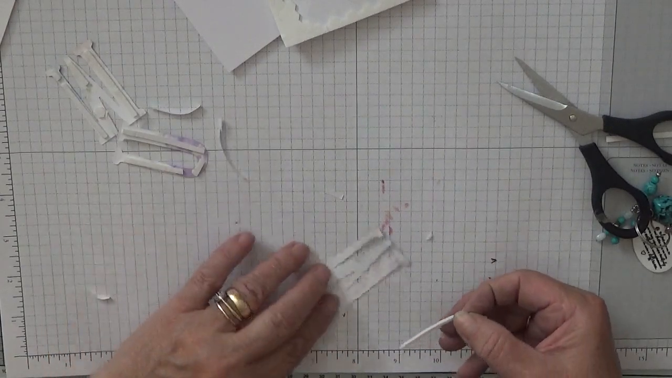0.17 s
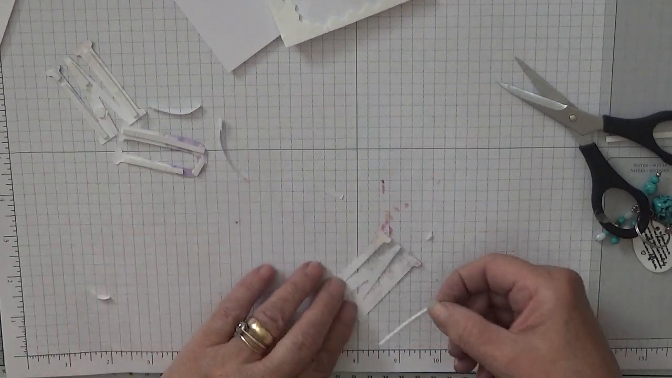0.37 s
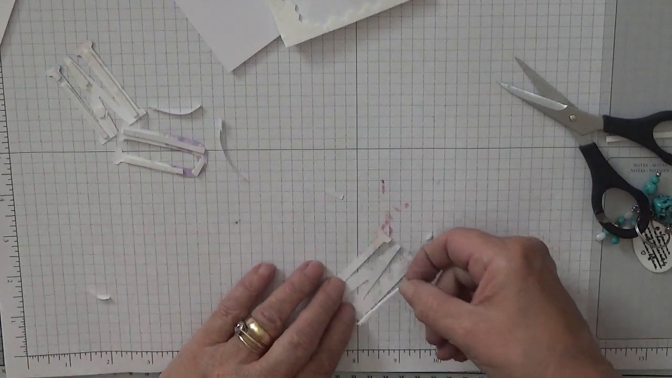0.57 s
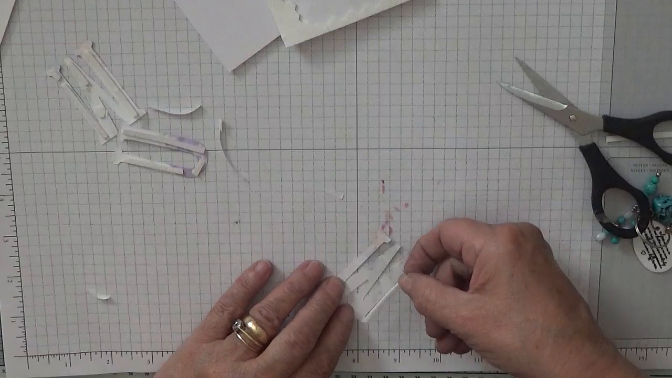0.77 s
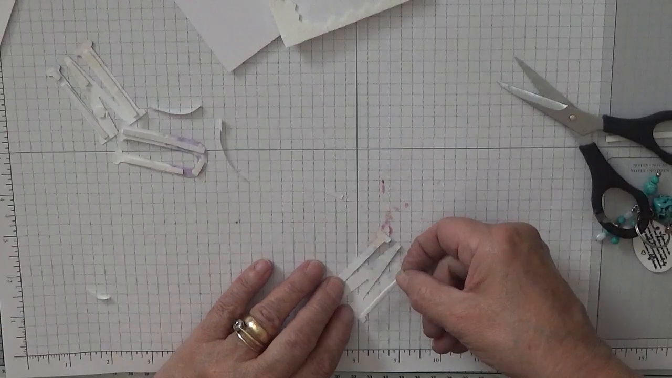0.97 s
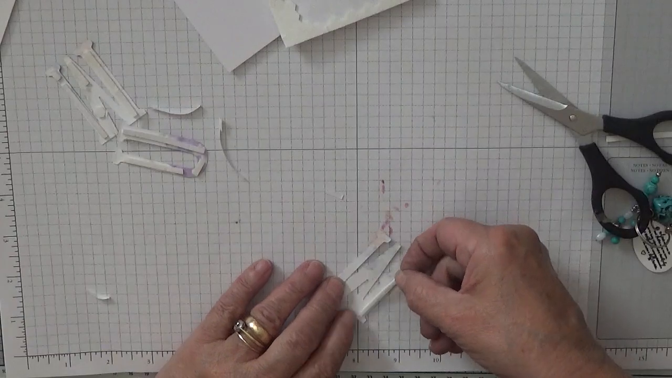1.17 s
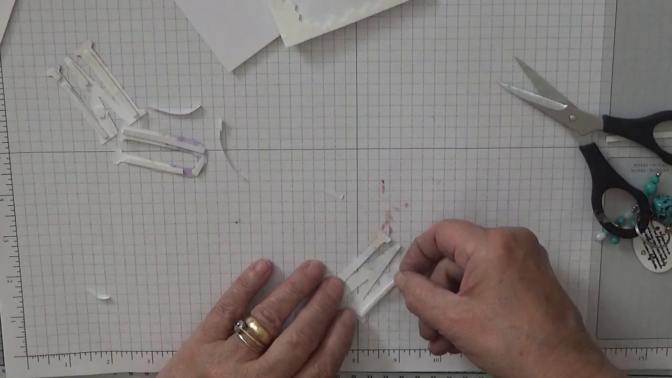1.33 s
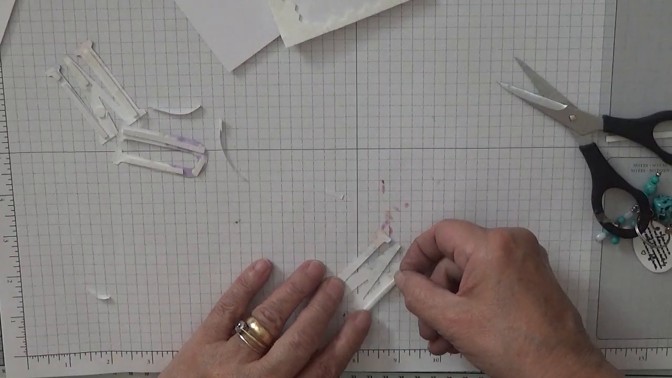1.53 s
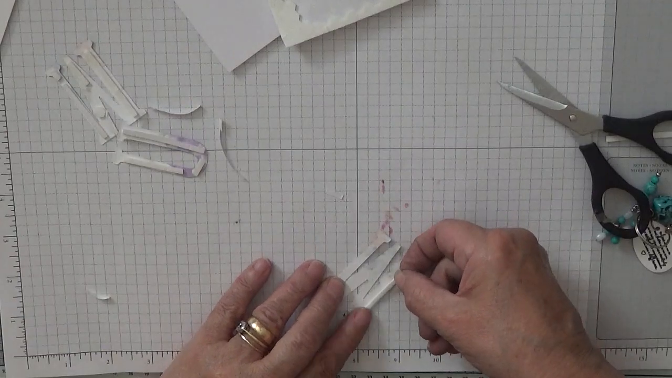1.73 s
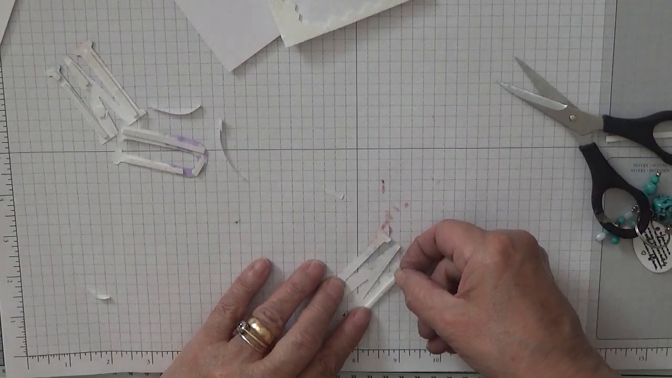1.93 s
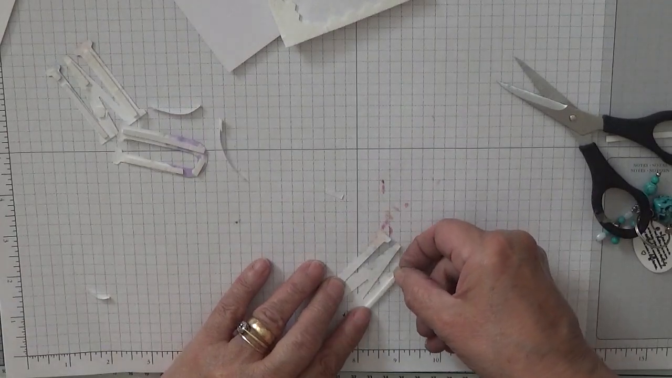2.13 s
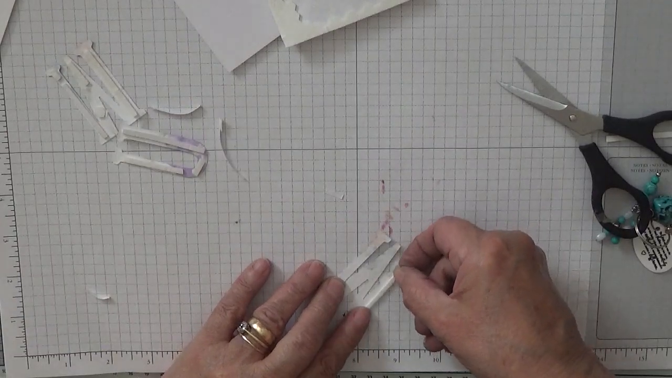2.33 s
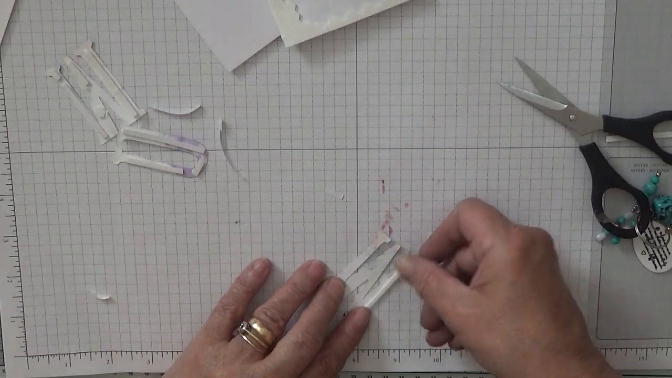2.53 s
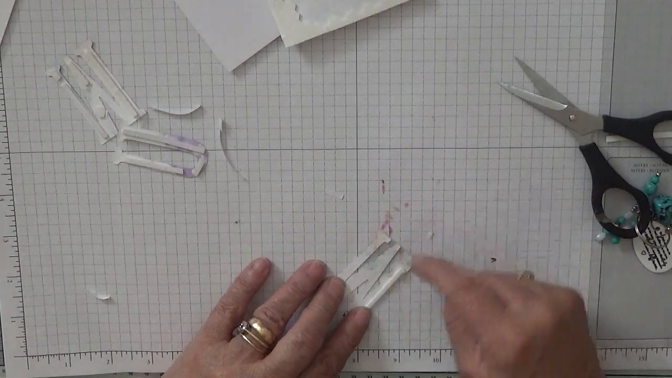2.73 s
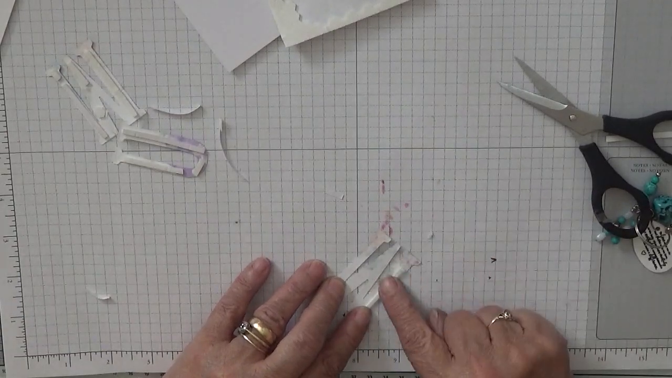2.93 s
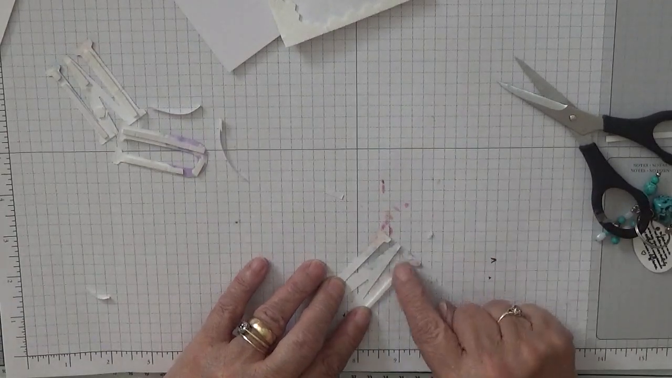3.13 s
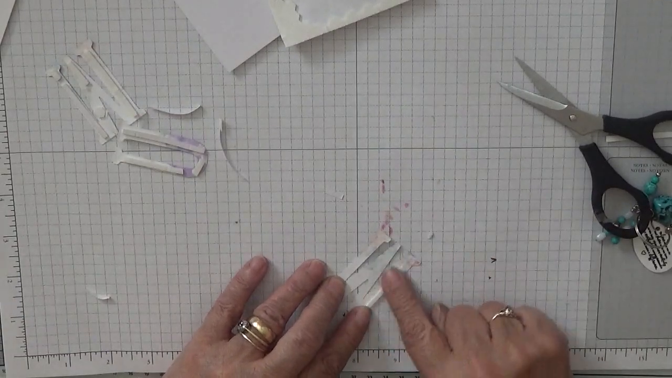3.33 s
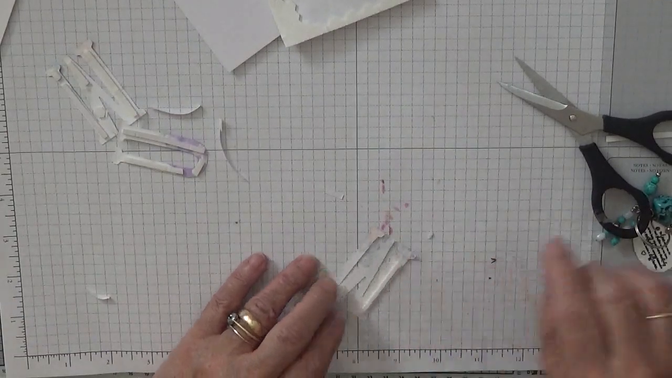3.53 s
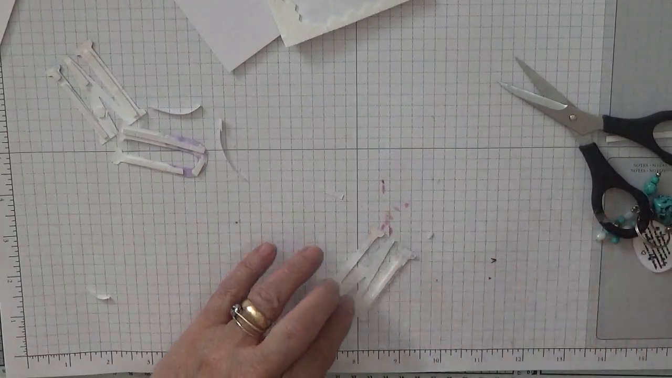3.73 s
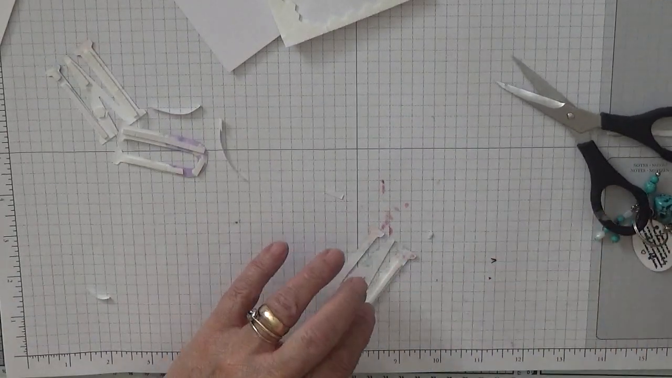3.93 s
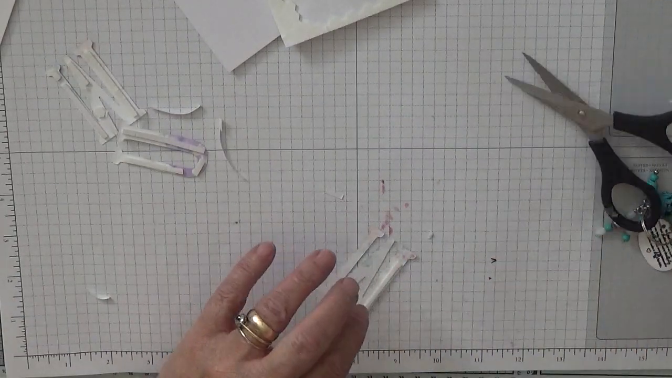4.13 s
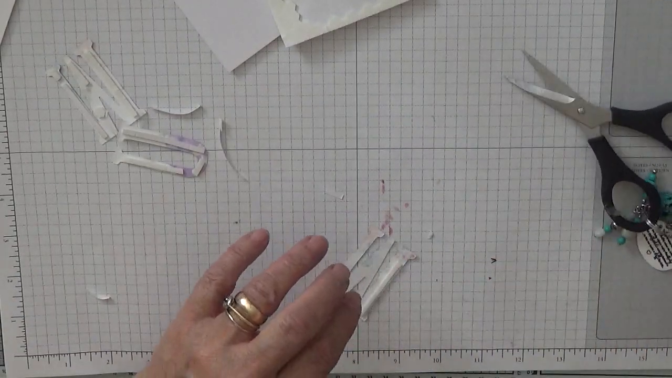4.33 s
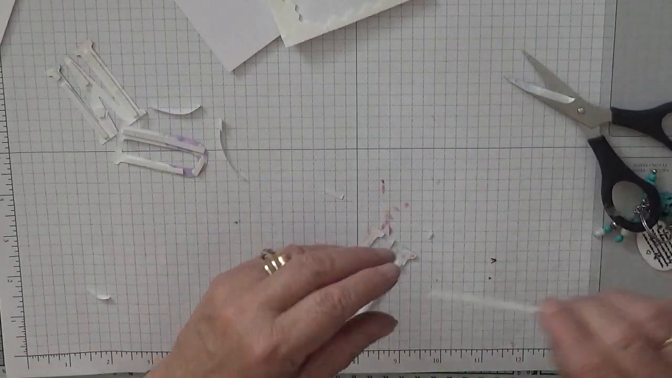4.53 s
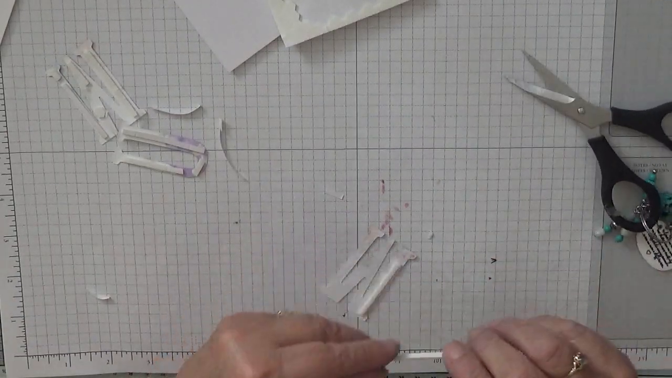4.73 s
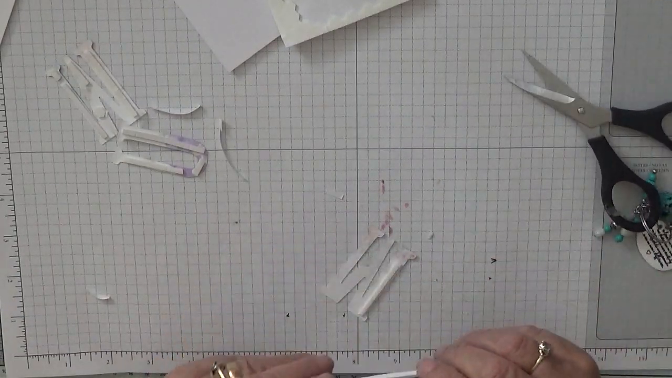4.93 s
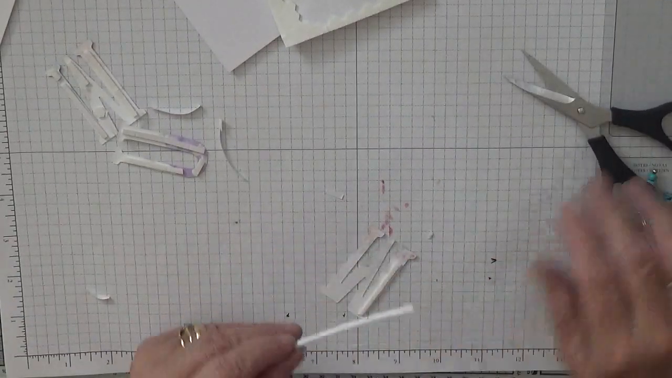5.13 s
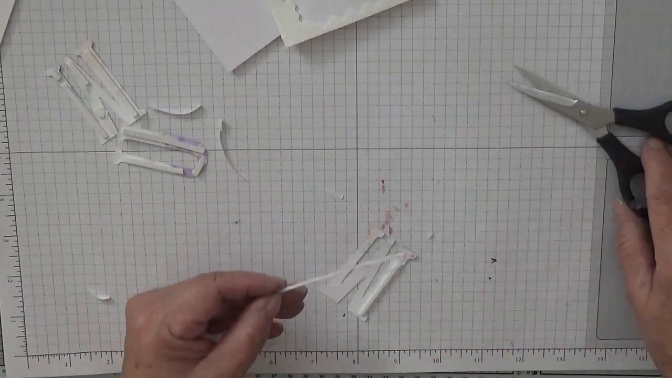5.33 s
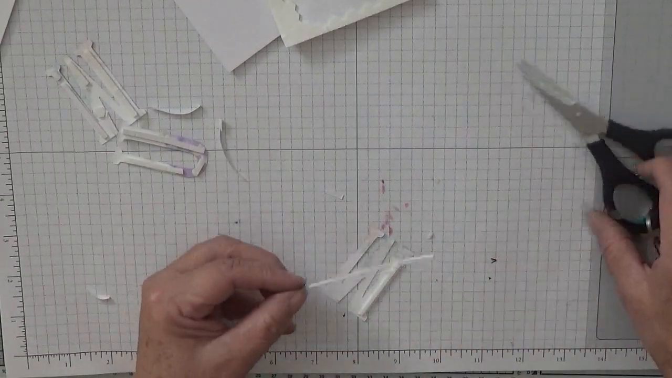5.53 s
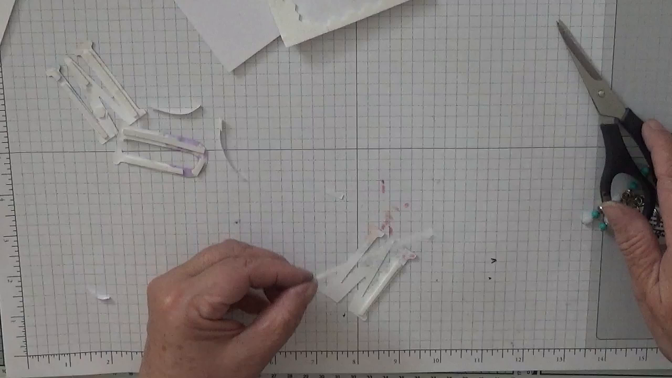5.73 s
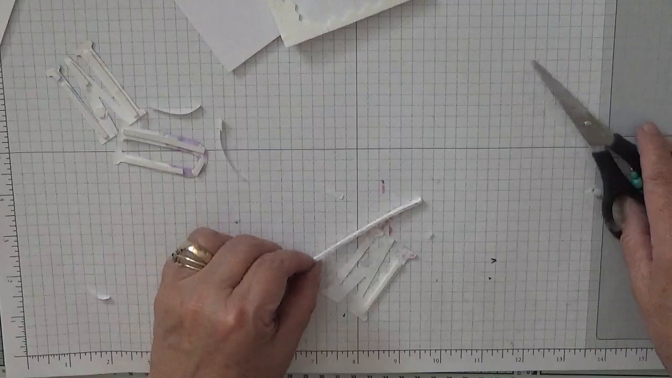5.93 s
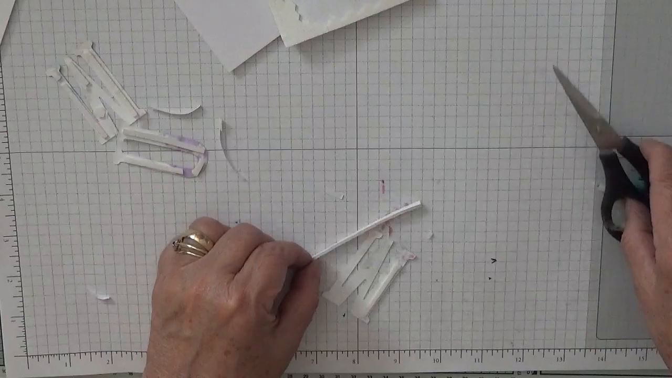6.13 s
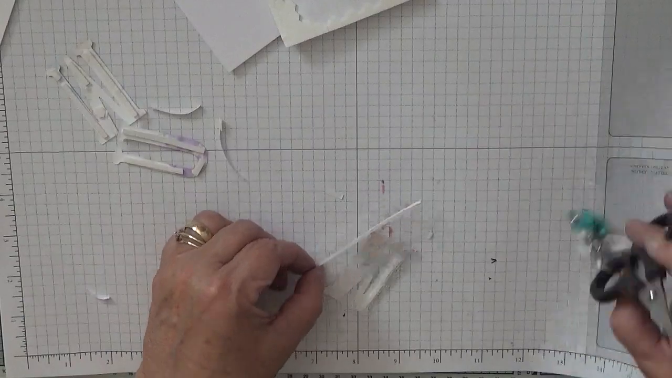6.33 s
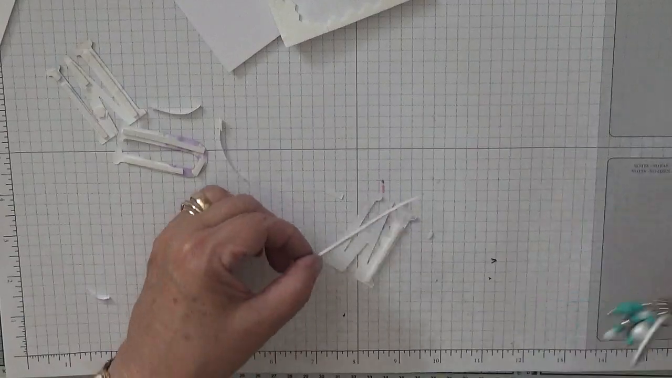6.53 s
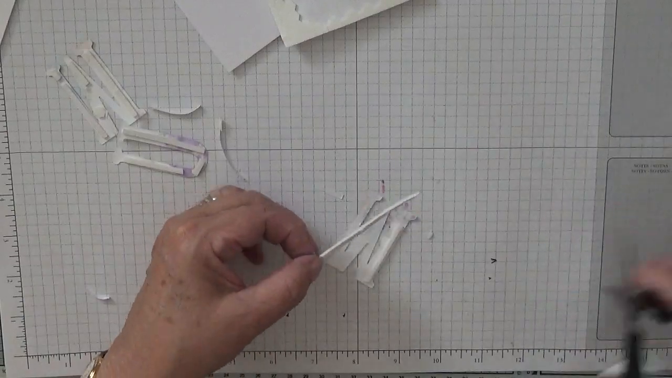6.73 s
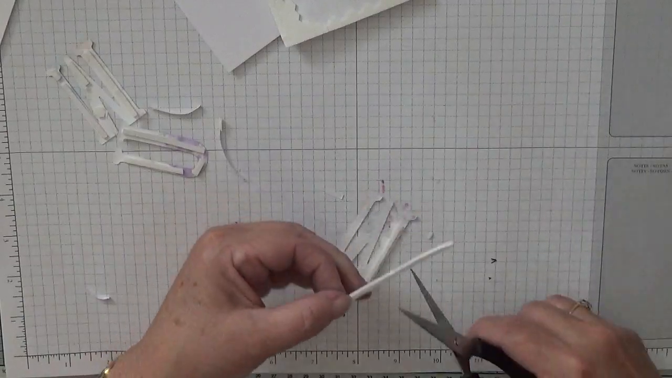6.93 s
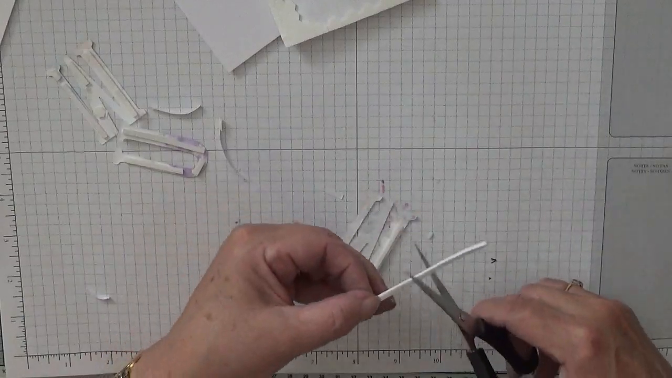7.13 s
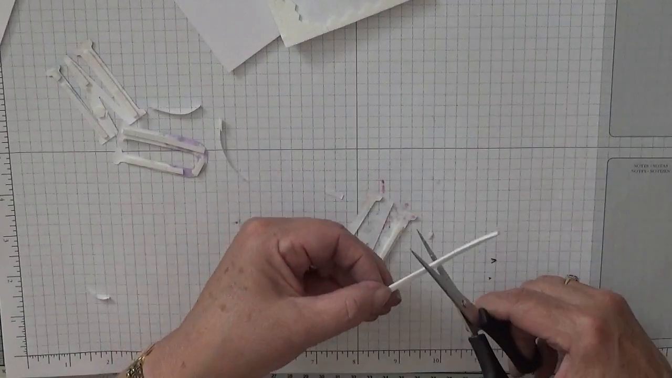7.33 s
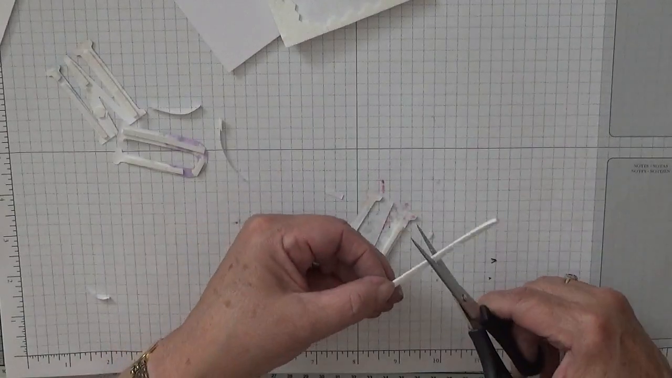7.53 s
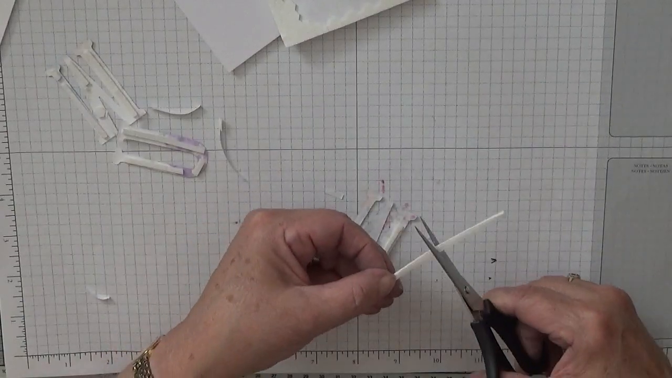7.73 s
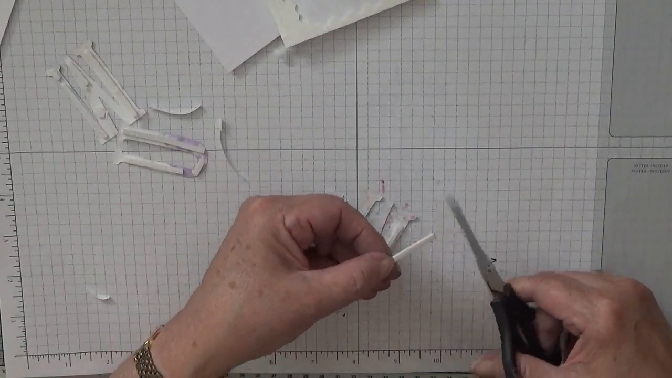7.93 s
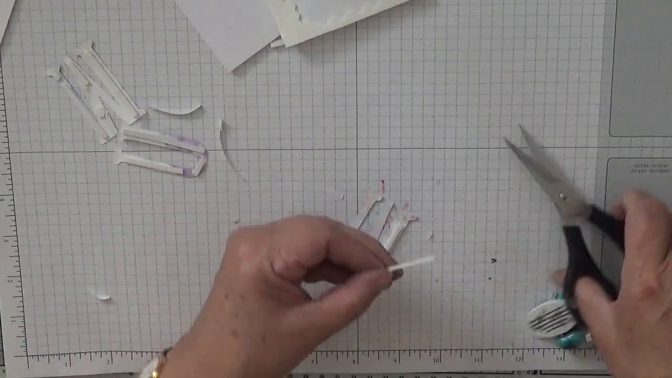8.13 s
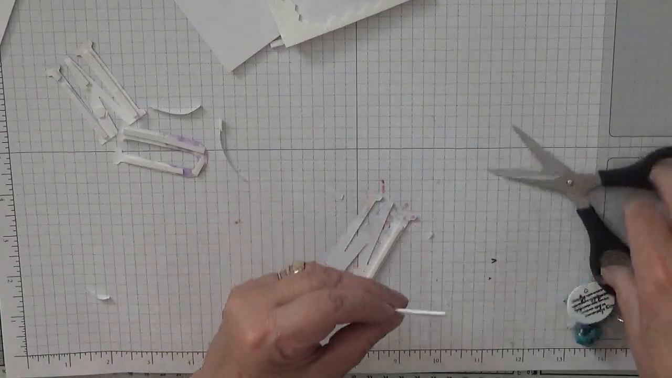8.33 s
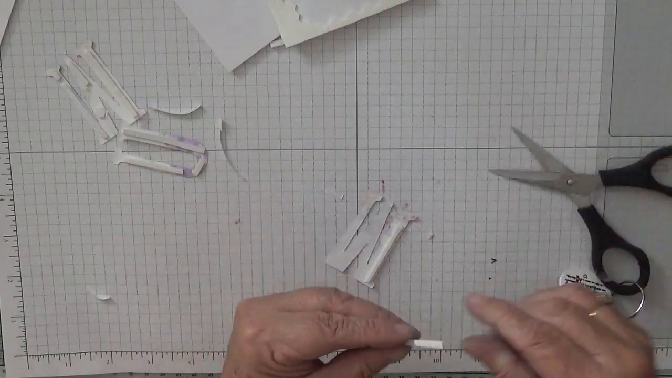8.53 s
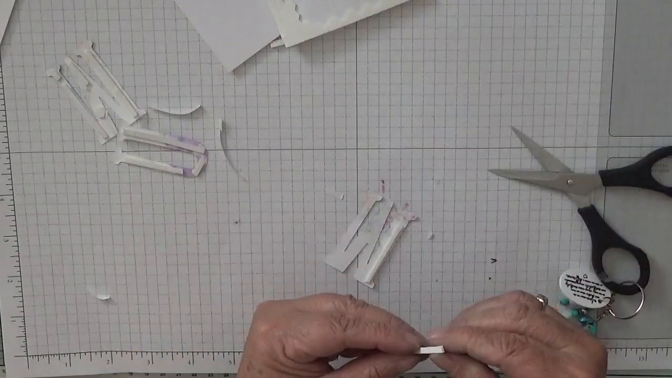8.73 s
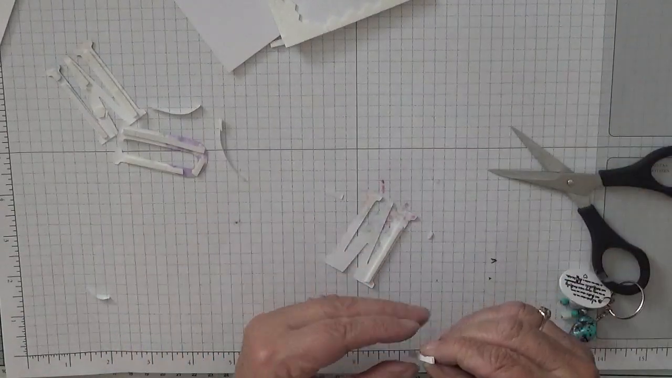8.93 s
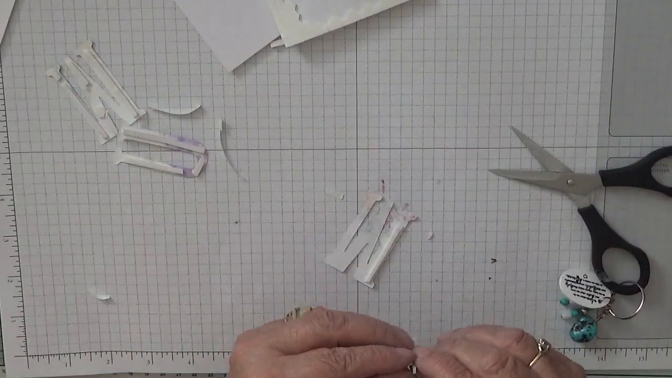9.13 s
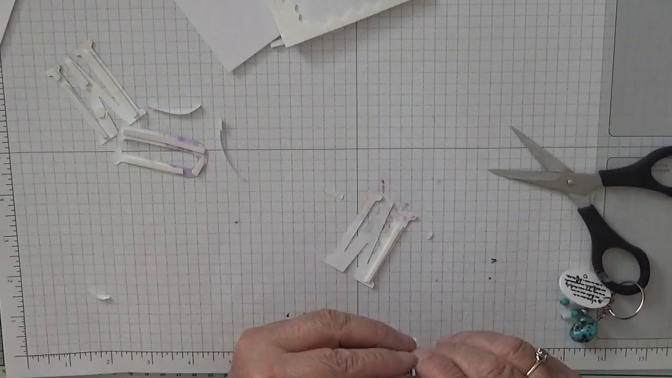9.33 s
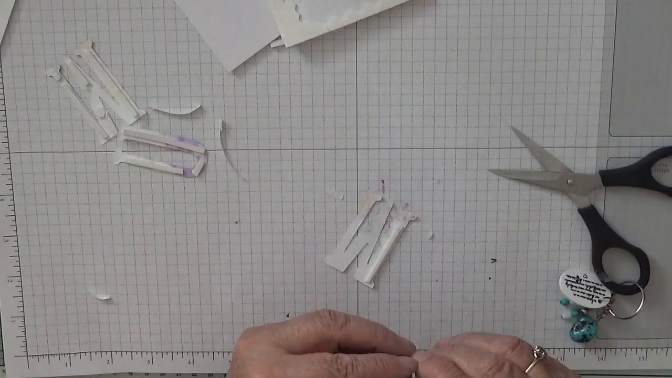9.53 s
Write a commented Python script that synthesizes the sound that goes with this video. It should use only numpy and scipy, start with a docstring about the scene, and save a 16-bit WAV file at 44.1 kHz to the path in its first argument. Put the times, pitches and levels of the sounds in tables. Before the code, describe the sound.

Near-silent fingering of paper over faint hiss and hum, then high tinkling of a charm on dragged scissors, a faint crunchy snip, a ringing landing.

```python
"""A small room, close to a cutting mat on a table: fingers smooth and pick at paper strips.
Scissors with a beaded metal charm are dragged off, swing and jangle, snip a strip and are put down.
Struck metal and the thumped table are damped modes; ticks, clicks and knocks are short bursts of band noise;
rubbed and cut paper and the drag over the mat are noise shaped by speed. Under it lie room hiss, mains hum,
a thin whine and the camera's faint falling chirp, 25 times a second."""
import sys
import numpy as np
from scipy import signal
from scipy.fft import rfft, irfft, next_fast_len
from scipy.io import wavfile
from scipy.ndimage import map_coordinates

SR = 44100
rng = np.random.default_rng(int(sys.argv[2]) if len(sys.argv) > 2 else 0)


def generate_wav(signal):
    """Clip the signal to [-1, 1] and save it as 16-bit WAV at the path in sys.argv[1]."""
    frames = np.transpose(np.atleast_2d(signal))
    scaled = np.clip(frames, -1, 1) * 32767
    pcm = np.round(scaled).astype(np.int16)
    wavfile.write(sys.argv[1], SR, pcm)


N = 426447

# Every level_db below is a setting within its table; the functions add a common offset.
# Beads strike the charm: start_s, level_db, pitch_hz, clack_db and sizzle_db (both relative to the ring)
CHARM_STRIKES = [(3.9127, -36.5, 7800, -17, -13), (4.2648, -34.5, 7760, -1, -11),
                 (5.2625, -25, 7700, -12, -12), (5.463, -38.5, 7500, -10, -2),
                 (5.5143, -34, 7660, -19, -20), (5.7594, -29.5, 7650, -13.5, -2),
                 (5.8474, -25, 7800, -18, -21), (5.8581, -19.5, 7730, -20.5, -28),
                 (5.9279, -15, 7790, -18.5, -25), (5.9753, -27.5, 7700, -5, -27),
                 (6.2672, -22, 7780, -25, -16), (6.3837, -16.5, 7870, -7.5, -10),
                 (6.4519, -18.5, 7430, -7, -8), (6.583, -36, 7760, -12, -9),
                 (6.6844, -12, 7720, -18, -13.5), (6.7241, -22, 7900, -2.5, -2),
                 (6.7514, -16.5, 7550, -15, -14), (6.7993, -11, 7740, -11.5, -30),
                 (6.8768, -18.5, 7880, -10.5, -18), (6.9356, -11.5, 7800, -19, -11.5),
                 (7.0245, -11, 7800, -37, -18), (7.0855, -12, 7820, -24, -6.5),
                 (7.2129, -20.5, 7750, -21, -21), (7.2858, -20.5, 7800, -16.5, -11.5),
                 (7.347, -32.5, 7920, -8, -10), (7.727, -49, 7530, 0, -5), (7.8248, -39.5, 7940, -4, -4),
                 (8.1125, -23, 7770, -17.5, -22), (8.122, -18, 7770, -11.5, -23),
                 (8.1344, -15, 7730, -16.5, -28), (8.167, -21.5, 7700, -9, -28),
                 (8.2013, -22.5, 7850, -9, -14), (8.2753, -17.5, 7770, -12, -9),
                 (8.304, -16.5, 7890, -19, -14.5), (8.3386, -21.5, 7640, -12, -20),
                 (8.3822, -26.5, 7670, -5.5, -0.5), (8.4106, -27, 7720, -30, -24)]
# The charm is shaken and its beads jostle: start_s, end_s, level_db
CHARM_SHAKES = [(5.868, 5.97, -35.5), (6.27, 6.43, -31), (6.689, 6.75, -25.5), (6.89, 6.93, -34.5),
                (8.119, 8.15, -22.5), (8.172, 8.25, -30), (8.299, 8.44, -34)]
# Other modes of the charm, beside its main note: pitch_hz, level_db, t60_s
CHARM_MODES = [(3164, -32, 0.058), (4160, -34, 0.015), (7370, -19, 0.032), (7640, -25, 0.079),
               (7740, -28.5, 0.03), (7540, -22.5, .025), (9100, -31.5, 0.012), (9600, -30, 0.033)]
# The scissors land on the mat: start_s, level_db
LANDINGS = [(8.2661, 1.5)]
# Modes of the steel blades: pitch_hz, level_db, t60_s
BLADE_MODES = [(4780, -7.5, 0.026), (5270, -12.5, .02), (5380, -18.5, .045), (5740, -3.5, .032),
               (6000, -2.5, .018), (6280, 3, .024), (6830, 1.5, 0.015), (7730, 0.5, 0.027),
               (8710, -8.5, 0.024)]
# The blades shut and spring open: start_s, level_db, handle_knock_db
BLADE_CLICKS = [(7.8803, -20, -6), (7.9605, -32.5, -6)]
# Hollow knocks of the plastic handles and beads: start_s, level_db, pitch_hz
HOLLOW_KNOCKS = [(6.226, -22, 3900), (6.436, -27.5, 3640), (6.446, -26.5, 4940), (7.0234, -33.5, 4020),
                 (7.0851, -21.5, 4580)]
# Dry ticks of nails, paper edges and handles: start_s, level_db, low_db and top_db (relative to the middle band)
DRY_TICKS = [(0.176, -38, -11, -9), (0.201, -37, -14, -18), (2.3824, -34, -33, -1), (2.4461, -24, -22, 9),
             (2.5389, -28.5, -12, 0.5), (2.7228, -36, -26, 0.5), (3.3983, -35.5, -5, 14),
             (3.8222, -36, -6, -11), (4.2413, -21, -6.5, 0.5), (4.2552, -17, 3, 13.5),
             (4.289, -30.5, -16, -6), (4.324, -35.5, 4, 5), (4.4184, -35, -19, 11),
             (5.2579, -26.5, 1, -1.5), (5.2775, -24, -1, 3.5), (5.8237, -31, -2, 0),
             (6.2143, -26.5, -15, 6), (6.3731, -16, -4.5, 10), (6.453, -13, -11.5, 6.5),
             (6.542, -32.5, 6, 2), (6.6448, -28.5, -13, 16), (6.746, -10.5, -29, 11.5),
             (7.104, -29, -8.5, -0.5), (7.2304, -23.5, -15.5, 6.5), (7.4045, -30.5, -12, 6),
             (7.427, -37, -9, 2), (8.053, -36, -21, -6), (8.0834, -35.5, -7, 13.5), (8.26, -20, -29, 14.5),
             (8.3559, -32, -12, 22)]
# Fingers stroke the paper; at 7.8 s the scissors crunch through a strip:
# fastest_s, length_s, hiss_db, mat_db (relative to the hiss)
PAPER_RUBS = [(0.005, 0.066, -52.5, -6.5), (.19, 0.13, -52, -14), (.35, 0.09, -53, -12),
              (.49, 0.28, -61, -8), (.77, 0.1, -69.5, -5), (2.6, 0.2, -63, -18), (2.88, 0.18, -64, -19),
              (3.1, 0.11, -59, -15), (3.23, 0.086, -57.5, -14), (3.36, 0.12, -55, -13.5),
              (3.54, 0.24, -66.5, -3), (3.84, 0.15, -62.5, -2.5), (3.94, 0.22, -59, -10),
              (4.1, 0.17, -57, -4.5), (4.425, 0.042, -58, -13), (4.82, 0.15, -62, -27),
              (5.03, 0.054, -63, -23), (7.8, 0.028, -49, -11.5), (8.56, 0.63, -68.5, -4.5),
              (8.89, .06, -61.5, -16.5)]
# Scissors and beads drag over the mat: fastest_s, length_s, hiss_db, mat_db (relative to the hiss)
DRAG_RUBS = [(5.275, .06, -50.5, -0.5), (5.36, .15, -58, -8.5), (5.47, .1, -52.5, -7),
             (5.59, 0.096, -48.5, 1), (5.68, .16, -54, -1), (5.9, .17, -51, -2), (6.01, .13, -54, -3),
             (6.18, .08, -56, -4.5), (6.29, .11, -38.5, -12), (6.385, .14, -37.5, -12),
             (6.55, .05, -54, -8), (6.64, .06, -52.5, -19.5), (6.74, .17, -47, -17),
             (8.135, .11, -46, -9.5), (8.275, 0.089, -44.5, -5.5), (8.37, .16, -54, -5.5)]
# Spectra of the paper, the drag, and the sounding mat: freq_hz, relative_db
PAPER_SPECTRUM = [(1180, -38), (2000, -14.5), (2160, -10.5), (2440, -3.5), (3560, -6.5), (4710, -4),
                  (6260, -6.5), (9070, -1), (11000, -9.5), (14300, -46), (22000, -120)]
DRAG_SPECTRUM = [(1180, -26), (2000, -14.5), (3770, -8.5), (4020, -7), (5130, -7), (5960, -8), (8150, -4.5),
                 (8820, -5), (10200, -7), (11000, -18), (14300, -46), (22000, -120)]
MAT_SPECTRUM = [(150, -33), (350, -12.5), (900, -11.5), (1550, -2.5), (2100, -3), (3200, -10.5),
                (6000, -49.5)]
# Hands and scissors bump the table: start_s, level_db, hardness_db
TABLE_BUMPS = [(0.011, -51.5, -22), (0.336, -61, 3), (1.87, -64, -4), (3.821, -39.5, -16), (4.253, -36, -1),
               (4.588, -50.5, -14), (5.276, -38.5, -3), (5.853, -38.5, 0), (5.927, -40.5, 1.5),
               (6.224, -46.5, 0.5), (8.205, -46, -3), (8.264, -47, 0.5), (9.091, -51.5, -3.5)]
# Modes of the table, before the hardness weighting: pitch_hz, level_db, t60_s
TABLE_MODES = [(86, -3.5, .2), (101.3, -0.5, 0.23), (118, 8, 0.13), (164.4, -1.5, 0.26), (206, 1, 0.13),
               (241, -3, 0.057), (357, -1, 0.052), (633, -4.5, 0.1), (659, 1, 0.2)]
# Spectrum of the room hiss: freq_hz, relative_db
AIR_SPECTRUM = [(41, -34), (70, -10.5), (174, -7), (380, -9), (423, -9), (703, -10.5), (945, -12),
                (1380, -13.5), (2160, -15.5), (2400, -15), (2960, -17), (11000, -24), (14300, -60.5),
                (22000, -120)]
# Mains overtones: multiple of the mains pitch, level_db (before a slow wobble)
HUM_OVERTONES = [(2, -77), (3, -74.5)]
# Drift of the beating low hum: time_s, gain_db
HUM_DRIFT = [(.8, 0.5), (2.1, -7.5), (3.4, -2.5), (4.7, 1), (6, -5), (7.4, 4), (8.7, -0.5)]
# Falling pitch of the camera chirp: time_in_cycle_s, pitch_hz
CHIRP_PITCH = [(0, 3610), (.0025, 2750), (.0045, 2409), (.011, 2400), (.04, 2180)]
# Loudness contour of the chirp: time_in_cycle_s, relative_db
CHIRP_LEVEL = [(0, 2.5), (.001, 5.5), (.004, -1), (.01, -0.5), (.014, -8.5), (.02, -39), (.04, -41)]
# Left-right likeness of diffuse sound at the microphone pair: freq_hz, correlation (-1 to 1)
MIC_LIKENESS = [(60, 0.41), (140, 0.82), (340, 0.42), (820, -0.06), (1950, -0.037), (4660, 0.45),
                (11100, 0.74)]
# Decay of the room tail, before early sound is added: freq_hz, t60_s
WALL_DECAY = [(150, 0.67), (1500, 0.47), (5000, 0.3), (10000, 0.28)]

TIME = np.arange(N) / SR  # s
AGE = np.arange(SR // 3) / SR  # s since a contact
RING_HZ, RING_SCATTER_HZ, RING_T60_S = 7750, 119.3, 0.027  # main note of the charm; scatter while jostling
GRAZE_LEAD_S, GRAZE_DB = 0.0024, -28.5
JOSTLES_PER_S, JOSTLE_SCATTER_DB = 75, 3
MAINS_HZ, BEAT_S, BEAT_CREST_S = 50.04, 1.321, 0.77
MAINS_DB, MOTOR_DB = -73.5, -66.5  # before the hum drift
WHINE_HZ, WHINE_DB = 7790, -80.5
CHIRP_CYCLE_S = 0.04
BAND_LIMIT_HZ = 11050


def charm():
    """Clear strikes as the charm swings, each just after a light graze."""
    out = np.zeros(N)
    for start_s, level_db, pitch_hz, clack_db, sizzle_db in CHARM_STRIKES:
        graze = crack(5000, 10410, t60=0.02)
        add(out, start_s - GRAZE_LEAD_S, amp(level_db + GRAZE_DB) * graze)
        add(out, start_s, amp(level_db + 2.5) * strike(pitch_hz, clack_db, sizzle_db))
    return out


def strike(pitch_hz, clack_db, sizzle_db):
    """A bead cracks against the charm: damped modes ring briefly under bursts of contact noise."""
    main_note = np.sin(2 * np.pi * pitch_hz * AGE) * fade(RING_T60_S)
    tone = to_peak_one(main_note + ring(CHARM_MODES, scatter_db=2.5))
    tone *= 1 - np.exp(-AGE / 0.0003)  # soften the onset
    clack = amp(clack_db + 5) * crack(3300, 7200, t60=0.014)
    sizzle = amp(sizzle_db + 5.5) * crack(8000, 9840, t60=0.012)
    dull_knock = amp(-32) * crack(480, 2500, t60=0.029)
    return tone + clack + sizzle + dull_knock


def jostle(clack_db, sizzle_db, colour_scatter_db):
    """While the charm is shaken, further strikes follow each other unevenly, one at random in each slot."""
    out = np.zeros(N)
    slot_s = 1 / JOSTLES_PER_S
    for start_s, end_s, level_db in CHARM_SHAKES:
        for slot in np.arange(start_s, end_s - slot_s / 2, slot_s):
            size, pitch, clack, sizzle = rng.standard_normal(4)
            hit = strike(RING_HZ + RING_SCATTER_HZ * pitch,
                         clack_db + colour_scatter_db * clack,
                         sizzle_db + colour_scatter_db * sizzle)
            hit_db = level_db + JOSTLE_SCATTER_DB * size
            add(out, slot + rng.random() * slot_s, amp(hit_db) * hit)
    return out


def chain(count, spread_s, level_db):
    """After each clear strike the small links settle with a few light ticks, later ones weaker on the whole."""
    out = np.zeros(N)
    for start_s, strike_db, *_ in CHARM_STRIKES:
        for wait, size, pitch in rng.random((count, 3)):
            note = 0.4 * np.sin(2 * np.pi * (7550 + 450 * pitch) * AGE) * fade(0.033)
            link = note + crack(3700, 10510, t60=0.00664)
            weight_db = min(strike_db, -17)  # the links are too light to follow a hard strike
            link_db = weight_db + level_db - 10 * size - 7.7 * wait
            add(out, start_s + spread_s * wait, amp(link_db) * link)
    return out


def landing():
    """The steel blades slap the mat one after the other; their damped modes ring shortly."""
    out = np.zeros(N)
    for start_s, level_db in LANDINGS:
        for lag_s in (0, 0.003):
            steel = to_peak_one(ring(BLADE_MODES, scatter_db=1.5))
            contact = 0.323 * crack(5700, 8900, t60=0.012) + 0.062 * crack(1300, 1700, t60=0.024)
            add(out, start_s + lag_s, amp(level_db - 7.5) * to_peak_one(steel + contact))
    return out


def scissors():
    """The blades click against their hollow plastic handles; handles and beads knock as narrow noise bursts."""
    out = np.zeros(N)
    for start_s, level_db, knock_db in BLADE_CLICKS:
        handles = crack(1400, 2800, t60=0.011) + amp(-14.5) * crack(1300, 2800, t60=0.12)
        click = to_peak_one(crack(4200, 9800, t60=0.0074) + amp(knock_db + 5.5) * handles)
        add(out, start_s - 0.004, amp(level_db - 14.5) * click)  # a light touch just before
        add(out, start_s, amp(level_db + 3.5) * click)
    for start_s, level_db, pitch_hz in HOLLOW_KNOCKS:
        knock = crack(0.88 * pitch_hz, 1.11 * pitch_hz, t60=0.01725)
        add(out, start_s, amp(level_db + 0.5) * knock)
    return out


def ticks():
    """Small dry contacts in three bands of noise, the low one lasting longest."""
    out = np.zeros(N)
    for start_s, level_db, low_db, top_db in DRY_TICKS:
        low = amp(low_db - 4) * crack(1100, 2400, t60=0.035)
        middle = crack(2900, 6500, t60=0.0057)
        top = amp(top_db) * crack(7900, 9800, t60=0.0067)
        add(out, start_s, amp(level_db) * to_peak_one(low + middle + top))
    return out


def drag():
    """Scissors and beads slide over the mat: friction hiss, with the mat sounding beneath."""
    return rub(DRAG_RUBS, DRAG_SPECTRUM, rise_share=0.43, edge_db=8, grain_db=1.5, hiss_db=0.5, body_db=-0.5)


def paper():
    """Fingers stroke paper and scissors cut it: friction hiss, with the mat sounding beneath."""
    return rub(PAPER_RUBS, PAPER_SPECTRUM, rise_share=0.41, edge_db=9, grain_db=2.0, hiss_db=0.5, body_db=-1.0)


def rub(movements, spectrum, rise_share, edge_db, grain_db, hiss_db, body_db):
    """Dense uneven slips, swelling as a movement speeds up; length_s spans the points edge_db below the peak."""
    hiss_power, body_power = np.zeros((2, N))
    for fastest_s, length_s, level_db, mat_db in movements:
        share = np.where(TIME < fastest_s, rise_share, 1 - rise_share)
        reach = (TIME - fastest_s) / (length_s * share)
        near = np.abs(reach) < 2
        power = amp(level_db - edge_db * reach[near] ** 2) ** 2
        hiss_power[near] += power
        body_power[near] += power * amp(mat_db) ** 2
    unevenness_db = grain_db * wobble(900) + 2.6 * wobble(45)
    slips = rng.standard_normal((2, N)) * amp(unevenness_db)
    hiss = amp(hiss_db) * np.sqrt(hiss_power) * coloured(slips[0], spectrum)
    body = amp(body_db) * np.sqrt(body_power) * coloured(slips[1], MAT_SPECTRUM)
    return hiss + body


def table():
    """Blows swell into the table's modes; harder ones reach the upper modes and make loose things clatter."""
    out = np.zeros(N)
    for start_s, level_db, hardness_db in TABLE_BUMPS:
        weight = [(120, -0.32), (160, -0.89), (400, -0.5), (600, hardness_db + 2.0)]  # freq_hz, gain_db
        modes = [(hz, mode_db + along(weight, hz), t60) for hz, mode_db, t60 in TABLE_MODES]
        swell = 1 - np.exp(-AGE / 0.0037)
        thud = to_peak_one(ring(modes, scatter_db=2.5) * swell) + 0.44 * crack(250, 1000, t60=0.2)
        clatter = amp(hardness_db + 7.0) * crack(900, 2000, t60=0.037)
        add(out, start_s, amp(level_db - 1.5) * (thud + clatter))
    return out


def background():
    """Diffuse room hiss on the microphone pair, with hum, whine and chirp the same on both sides."""
    air = amp(-63.5) * unit(microphone_pair(coloured(rng.standard_normal((2, N)), AIR_SPECTRUM)))
    return air + hum() + whine() + chirp()


def hum():
    """Mains hum with overtones, beating against a slightly slower motor that swells and partly cancels it."""
    phase = 2 * np.pi * MAINS_HZ * TIME
    slip = 2 * np.pi * (TIME - BEAT_CREST_S) / BEAT_S
    mains = amp(MAINS_DB) * np.sin(phase)
    motor = amp(MOTOR_DB) * np.sin(phase - slip)
    drift = amp(np.interp(TIME, *np.transpose(HUM_DRIFT)))
    overtones = sum(amp(level_db + wobble(1.2)) * np.sin(k * phase) for k, level_db in HUM_OVERTONES)
    return (mains + motor) * drift + overtones


def whine():
    """A thin tone of even level whose phase wavers."""
    return amp(WHINE_DB) * np.sin(2 * np.pi * WHINE_HZ * TIME + wobble(60))


def chirp():
    """The camera's falling chirp once a frame: a swept sine with a wavering level and phase."""
    cycle_s = (TIME + 0.0025) % CHIRP_CYCLE_S
    sweep = np.cumsum(np.interp(AGE, *np.transpose(CHIRP_PITCH))) / SR  # turns since the cycle began
    phase = 2 * np.pi * np.interp(cycle_s, AGE, sweep) + 0.47 * wobble(400)
    level_db = np.interp(cycle_s, *np.transpose(CHIRP_LEVEL)) + 1.5 * wobble(60)
    return amp(-66.0) * amp(level_db) * np.sin(phase)


def place(x, left_db, room_db):
    """A source with its share of the room; left_db is how much louder the left side is set."""
    reflected = amp(room_db) * microphone_pair(room(x, early_db=3.0))
    return (x + reflected) * amp([[left_db / 2], [-left_db / 2]])


def room(x, early_db):
    """Decaying noise as reflections: close surfaces first, then the walls, unalike in its two channels."""
    hz, t, z = signal.stft(rng.standard_normal((2, SR // 2)), SR, nperseg=256)
    decay = np.exp(-np.log(1000) * t / along(WALL_DECAY, hz)[:, None])
    tail = signal.istft(z * decay, SR, nperseg=256)[1][:, :len(AGE)]
    tail *= 1 + amp(early_db) * fade(0.11)
    tail *= 1 - np.exp(-AGE / 0.003)
    return signal.fftconvolve(x[None], tail / np.linalg.norm(tail[0]), axes=1)[:, :N]


def microphone_pair(pair):
    """Mix two unrelated signals as mid and side, so that left and right are as alike as in a diffuse sound."""
    def mid_side(hz):
        """Gains whose squares differ by the wanted correlation."""
        turn = np.arccos(np.clip(along(MIC_LIKENESS, hz), -1, 1)) / 2
        return np.array([np.cos(turn), np.sin(turn)])
    mid, side = filtered(pair, mid_side)
    return np.array([mid + side, mid - side])


def ring(modes, scatter_db):
    """Damped modes, with new strengths and signs for each blow."""
    out = np.zeros(len(AGE))
    for hz, level_db, t60 in modes:
        strength = amp(level_db + scatter_db * rng.normal()) * rng.choice([-1, 1])
        out += strength * fade(t60) * np.sin(2 * np.pi * hz * AGE)
    return out


def crack(lo_hz, hi_hz, t60):
    """A short burst of contact noise in a band, peak 1."""
    band = signal.butter(2, [lo_hz, min(hi_hz, SR / 2 - 1)], 'band', fs=SR, output='sos')
    return to_peak_one(signal.sosfilt(band, rng.standard_normal(len(AGE)) * fade(t60)))


def fade(t60):
    """Free decay after a contact, 60 dB down after t60 seconds."""
    return np.exp(-np.log(1000) * AGE / t60)


def wobble(rate):
    """A smooth random curve, rate knots a second."""
    return map_coordinates(rng.standard_normal(int(N * rate / SR) + 4), [TIME * rate])


def coloured(x, spectrum):
    """x through a spectrum, at rms 1."""
    return unit(filtered(x, lambda hz: amp(along(spectrum, hz))))


def filtered(x, response):
    """x times a response of frequency."""
    m = next_fast_len(N + SR // 2)
    return irfft(rfft(x, m) * response(np.fft.rfftfreq(m, 1 / SR)), m)[..., :N]


def along(points, hz):
    """Read (Hz, value) points on a log frequency axis."""
    f, v = np.transpose(points)
    return np.interp(np.log(hz + 1), np.log(f + 1), v)


def add(track, start_s, sound):
    """Mix a sound into the track at start_s."""
    i = max(0, round(start_s * SR))
    track[i:i + len(sound)] += sound[:max(0, N - i)]


def amp(db):
    """Decibels to gain."""
    return 10 ** (np.asarray(db) / 20)


def unit(x):
    """Scale to rms 1."""
    return x / np.sqrt(np.mean(x ** 2) + 1e-20)


def to_peak_one(x):
    """Scale to peak 1."""
    return x / np.abs(x).max()


def scene():
    """Everything on the table, over the background."""
    beads = charm() + jostle(clack_db=-11, sizzle_db=-10.5, colour_scatter_db=6)
    beads += chain(count=3, spread_s=0.051, level_db=-6.5)
    metal = place(beads + landing(), left_db=2.0, room_db=-11)
    contacts = place(scissors() + ticks(), left_db=1.0, room_db=-8.5)
    friction = place(drag(), left_db=1.1, room_db=-6.5) + place(paper(), left_db=0.8, room_db=-7.0)
    thumps = place(table(), left_db=-0.8, room_db=-7.0)
    return metal + contacts + friction + thumps + background()


def record(dry):
    """The camera's band limit: a very steep low-pass."""
    return filtered(dry, lambda hz: 1 / np.sqrt(1 + (hz / BAND_LIMIT_HZ) ** 160))


dry = scene()
out = record(dry)
generate_wav(out)
```